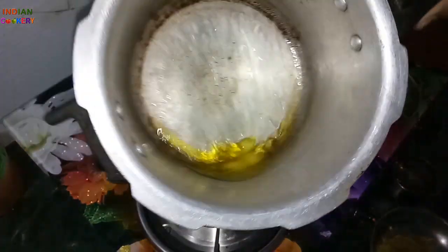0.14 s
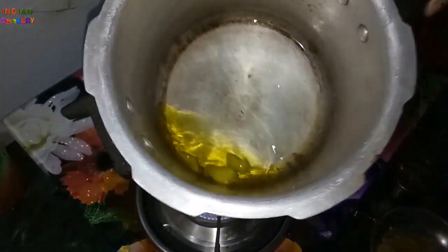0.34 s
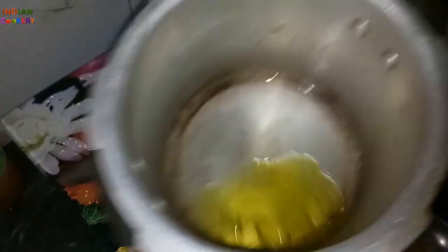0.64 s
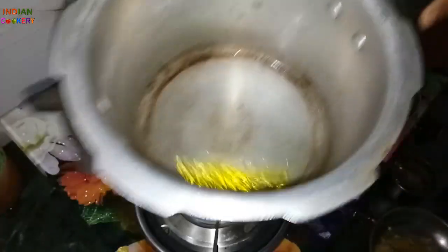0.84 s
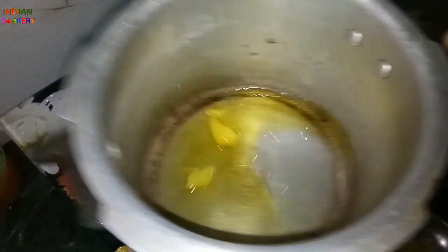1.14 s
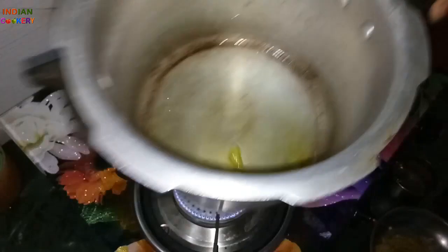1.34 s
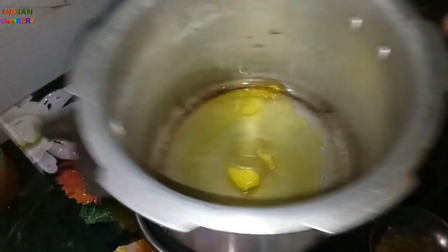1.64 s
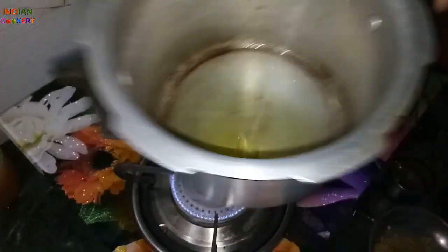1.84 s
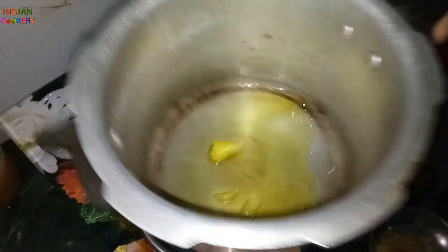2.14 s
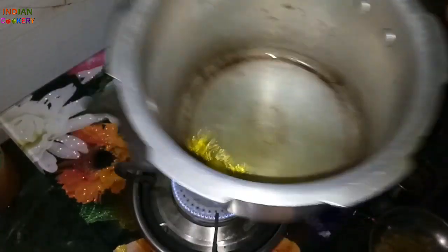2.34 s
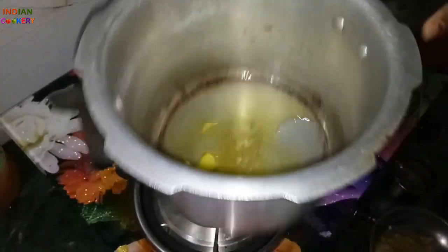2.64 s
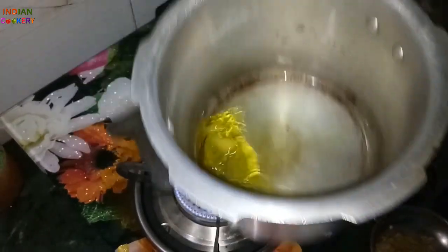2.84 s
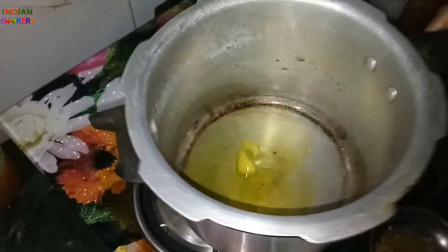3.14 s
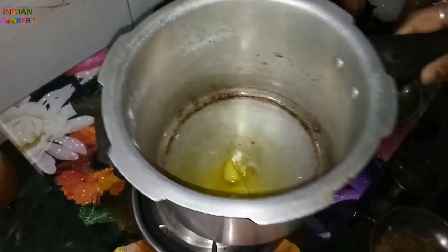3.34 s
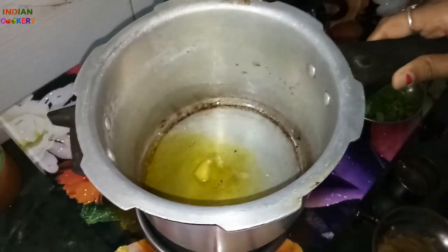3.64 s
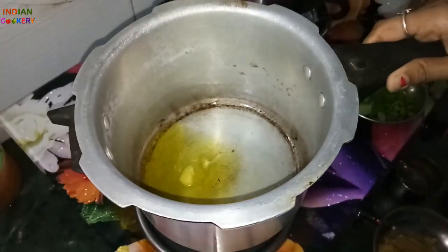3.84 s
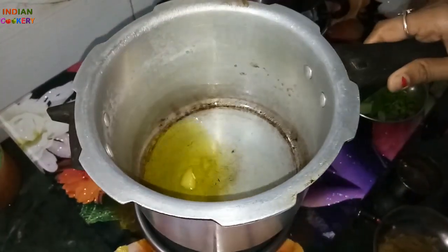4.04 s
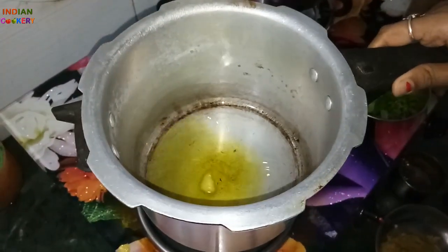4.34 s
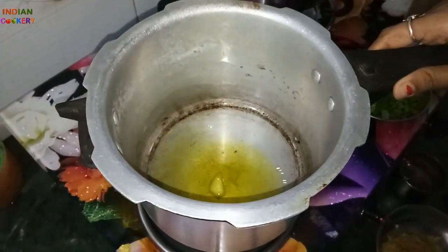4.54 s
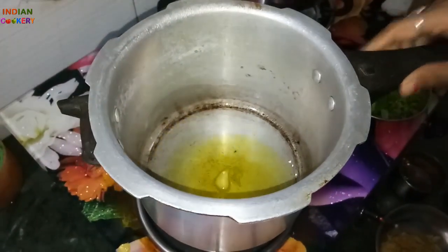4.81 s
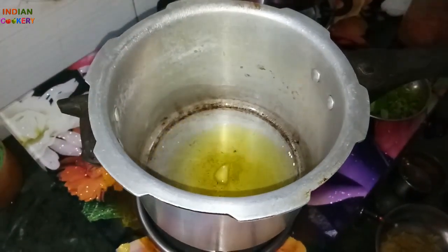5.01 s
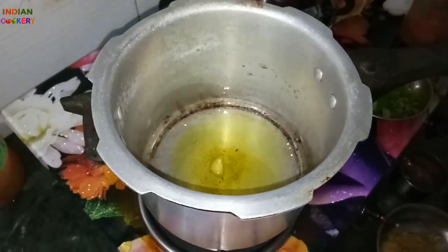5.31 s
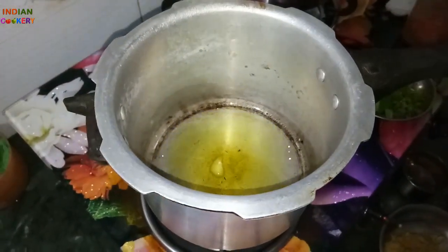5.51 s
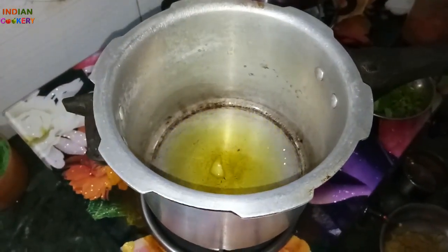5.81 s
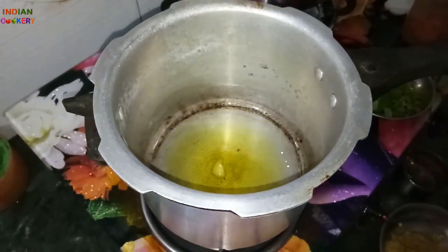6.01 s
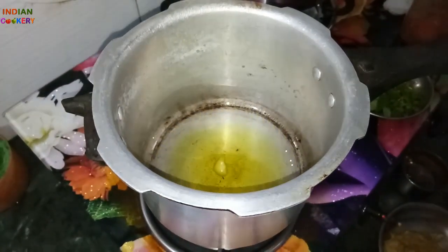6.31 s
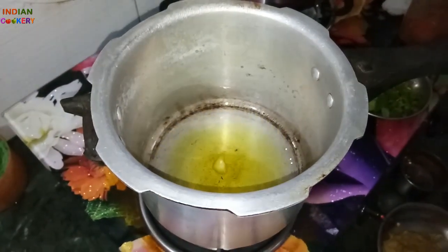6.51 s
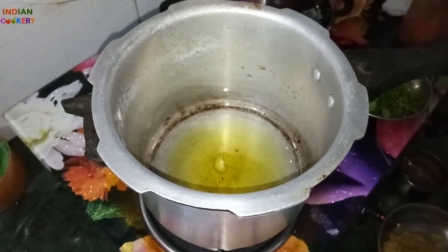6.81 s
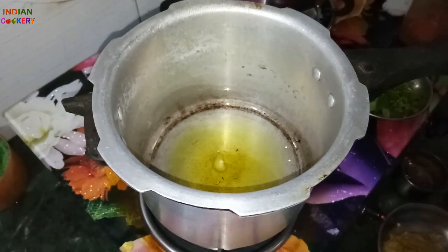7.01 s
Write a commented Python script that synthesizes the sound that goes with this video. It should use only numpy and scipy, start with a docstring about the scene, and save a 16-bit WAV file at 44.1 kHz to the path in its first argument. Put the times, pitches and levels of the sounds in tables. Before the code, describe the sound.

Fat melts in a hot metal cooker, recorded very close by phone in a small, slightly reverberant kitchen. At 0 s a bright rush of sizzling drops quickly to crackle, with a splutter around 0.4-0.6 s. From 0.7 to 2.4 s sharp high ticks and snapping pops come thickly, fizz swelling near 1.6 and 2.1 s. A brief splutter comes at 2.6 s, then sparser pops. Hard spits crack at 3.4 and 3.55 s. Around 3.9-4.2 s lower, hollow pops ring the metal amid another fizz flare. Dull worktop knocks land near 4.0, 4.4, 4.8 and 5.0 s, the 4.4 s one strongest. Fine fizz then nearly vanishes; distinct pops, low and high, with short metallic rings, continue irregularly to 7 s, crowding around 5.4-6.0 s. A faint sliding wash ends by 4.2 s; a very quiet, fluttering gas flame lies underneath throughout.

```python
"""Ghee melting in a hot aluminium pressure cooker on a gas stove, close to a phone in a small kitchen.
Water in the fat boils off: steam bubbles pop and ring the pot, drops spit, ticks and a fine fizz surround them.
Pops are torn clicks plus pot modes, most of which sink as the melt spreads; the fizz is random grains and hiss.
Swirled ghee washes softly round the pot. Dull knocks, as noisy rattles and a low sine, come from the worktop.
Behind them lie the short reverberation of the kitchen and the fluttering noise of the gas flame."""
import sys
import numpy as np
from scipy import signal
from scipy.fft import rfft, irfft
from scipy.io import wavfile
from scipy.ndimage import uniform_filter1d

SR = 44100
rng = np.random.default_rng(int(sys.argv[2]) if len(sys.argv) > 2 else 0)


def unload_audio(sound):
    """Save the sound as a 16-bit wav file, at the path given as the first command line argument."""
    columns = np.transpose(np.atleast_2d(sound))
    # keep every value between -1 and 1, then stretch to whole-number steps
    steps = np.round(np.clip(columns, -1, 1) * 32767)
    wavfile.write(sys.argv[1], SR, steps.astype(np.int16))


N = 315756
TIME = np.arange(N) / SR
# short sounds: length in samples, their frequencies [Hz] and time since onset [s]
TAPS = 4096
HZ = np.fft.rfftfreq(TAPS, 1 / SR)
AGE = np.arange(TAPS) / SR
EDGE_HZ = 15850  # upper band edge of the phone


def amp(db):
    """Decibels to gain."""
    return 10 ** (np.asarray(db) / 20)


def evened(x):
    """Scales to rms 1."""
    return x / np.sqrt(np.mean(x ** 2) + 1e-20)


def burst(x):
    """Scales a short sound to the energy of 10 ms at rms 1."""
    return x * np.sqrt(SR / 100 / np.sum(x ** 2))


def spectrum(points, hz):
    """Reads a table on a logarithmic frequency axis."""
    f, value = np.transpose(points)
    return np.interp(np.log(hz + 1), np.log(f), value)


def add(mix, s, sound):
    """Mixes a sound in at time s."""
    part = mix[max(round(s * SR), 0):][:len(sound)]
    part += sound[:len(part)]


def click(gain):
    """The causal, minimum-phase click that has this gain at each of HZ."""
    both_sides = np.r_[gain, gain[-2:0:-1]]
    log_gain = np.log(np.maximum(both_sides, 1e-5))
    return np.fft.ifft(np.exp(np.conj(signal.hilbert(log_gain)))).real


def peak(hz, centre_hz, width_hz):
    """Gain of one resonance."""
    return 1 / np.sqrt(1 + ((hz ** 2 - centre_hz ** 2) / (width_hz * (hz + 1))) ** 2)


def dying(t, t60):
    """Decay by 60 dB in t60 seconds."""
    return np.exp(-np.log(1000) * t / t60)


# big, low bubbles shove the pot fully; above SHOVE_HZ the ring and the snap weaken with every octave
SHOVE_HZ, RING_DB_PER_OCTAVE, SNAP_DB_PER_OCTAVE = 3600, -16.5, -6.5
# a film can snap only so hard: its level at a pop of FILM_DB, and the dB that it gains per dB of pop
FILM_DB, FILM_GROWTH = -29, 0.67
# larger steam bubbles bursting, close to the phone: (time [s], level [dB], bubble pitch [Hz])
BUBBLE_POPS = [(0.024, -25, 6850), (0.052, -24, 7100), (0.3826, -43.5, 3600), (0.3876, -24, 6770),
               (0.6414, -25.5, 6060), (0.7763, -29.5, 7200), (0.8256, -30, 6600), (0.838, -23.5, 8100),
               (0.8799, -25, 6950), (0.8984, -31.5, 4960), (0.956, -32, 7000), (1.0523, -29, 6740),
               (1.1809, -23, 6900), (1.2368, -29, 3930), (1.2642, -33.5, 2300), (1.7524, -33, 5000),
               (1.809, -32.5, 3830), (2.4723, -31, 4790), (2.5063, -33.5, 4730), (2.5743, -39, 2750),
               (2.5878, -37.5, 3600), (2.8882, -26.5, 6750), (2.9952, -29, 5970), (3.083, -29.5, 3600),
               (3.131, -30.5, 5730), (3.429, -27.5, 7150), (3.5956, -30, 6900), (3.6672, -28.5, 7200),
               (3.806, -31.5, 5360), (3.8587, -32.5, 6300), (3.888, -22.5, 2410), (3.9063, -25.5, 2280),
               (3.9403, -28.5, 7000), (4.018, -26, 6960), (4.051, -26.5, 2140), (4.1426, -30.5, 4600),
               (4.1981, -24, 4460), (4.3197, -28.5, 2230), (4.508, -34.5, 5530), (4.5864, -28, 3560),
               (4.643, -25.5, 6500), (4.8909, -33.5, 4270), (5.0773, -31.5, 3610), (5.131, -30, 3900),
               (5.1591, -32.5, 2330), (5.191, -34, 6400), (5.2945, -32.5, 5260), (5.4138, -28, 6260),
               (5.4392, -26.5, 3610), (5.5163, -30.5, 5260), (5.574, -34, 5550), (5.6026, -34, 4550),
               (5.646, -31.5, 4680), (5.6853, -29, 6600), (5.875, -31, 6800), (5.9173, -30, 4650),
               (5.946, -32.5, 5700), (5.9781, -30.5, 3670), (5.987, -35.5, 4700), (6.013, -41.5, 3100),
               (6.2771, -26, 5430), (6.3681, -28.5, 6590), (6.3875, -32, 3890), (6.5171, -32, 3830),
               (6.5523, -24.5, 2450), (6.5917, -27.5, 6030), (6.6894, -34, 5100), (6.7537, -31.5, 2700),
               (6.8011, -28, 6750), (6.817, -26, 4740), (6.8805, -34.5, 3960), (6.916, -27.5, 2510),
               (6.9728, -29.5, 5670), (7.0241, -32.5, 4360), (7.07, -28.5, 3210)]


def pops(bubble_db, snap_db, ring_db, dull_hz):
    """The film snaps, the steam pocket rings for a few cycles, and the pot sings on, most after big bubbles."""
    out = np.zeros(N)
    for s, level_db, hz in BUBBLE_POPS:
        smallness = max(np.log2(hz / SHOVE_HZ), 0)  # octaves
        film_db = FILM_DB + FILM_GROWTH * (level_db - FILM_DB) + SNAP_DB_PER_OCTAVE * smallness
        pot_db = level_db + RING_DB_PER_OCTAVE * smallness

        pocket = click(peak(HZ, hz, width_hz=.11 * hz) * peak(HZ, hz, width_hz=.7 * hz))
        pocket = signal.oaconvolve(pocket, stutter(count=3, spread_s=0.0052))

        # shreds of the film whistle high up
        shred = peak(HZ, rng.uniform(8620, 9800), width_hz=120)
        snap = click(snap_colour() * (1 + 3.4 * shred) / (1 + (HZ / dull_hz) ** 4))
        snap = signal.oaconvolve(snap, stutter(count=3, spread_s=0.024))

        add(out, s, amp(level_db + bubble_db) * burst(walls(pocket, echo_db=6.5, t60=0.085)))
        add(out, s, amp(film_db + snap_db) * burst(walls(snap, echo_db=6.5, t60=0.019)))
        add(out, s, amp(pot_db + ring_db) * pot_ring(s, hz, spill=0.053))
    return out


# colour of a snapping film: (frequency [Hz], relative level [dB per Hz])
SNAP_SPECTRUM = [(330, -34), (520, -12.5), (1000, -20.5), (2200, -12.5), (4000, -5.5), (6000, -4),
                 (8000, -6), (10000, 6), (11500, -3), (13500, -10.5), (14900, 4), (16000, 2)]


def snap_colour():
    """Gain at each of HZ of the bright crack shared by films, droplets, spits and splutters."""
    return amp(spectrum(SNAP_SPECTRUM, HZ))


def stutter(count, spread_s):
    """A film tears in one full slip, then several at random, the later ones weaker on average."""
    delay, size = rng.random((2, count))
    slips = np.zeros(TAPS)
    places = np.minimum(delay * spread_s * SR, TAPS - 1).astype(int)
    slips[places] = size * (1 - delay / 2) * rng.choice([-1, 1], count)
    slips[0] = 1
    return slips


def walls(x, echo_db, t60):
    """The direct sound, then its scatter between the metal walls of the pot as decaying noise."""
    echoes = rng.standard_normal(TAPS) * dying(AGE, t60) * (1 - np.exp(-AGE / 0.00018))
    echoes *= amp(echo_db) / np.linalg.norm(echoes)
    echoes[0] = 1
    return signal.oaconvolve(x, echoes)


# how far the melt loads the bottom of the pot: (time [s], share [0-1])
MELT_SPREAD = [(0, 0.11), (3.2, 0.24), (3.9, 0.3), (4.35, 0.69), (4.6, 0.69), (5.5, 0.95), (6.6, 0.98)]
# modes of the pot, before random detuning and the extra early decay:
# (dry frequency [Hz], level [dB], t60 [s], drop under the full melt [Hz], negative = rise)
POT_MODES = [(1757, -2.5, 0.11, 156.5), (2500.6, 1, 0.098, 163), (2531, 1, 0.22, 127), (3501, -3, 0.22, 86),
             (4270, 0, 0.037, 72), (5017, -4, 0.1, -13), (5540, -15.5, 0.27, 87), (6720, -1.5, 0.073, -8),
             (6950, -0.5, 0.054, 13)]


def pot_ring(s, pitch_hz, spill):
    """The pot's modes; those near the bubble's pitch are driven hardest, and the sloshing fat makes them waver."""
    t = np.arange(SR // 4) / SR
    hz, db, t60, drop_hz = np.transpose(POT_MODES)[:, :, None]
    hz = hz - drop_hz * np.interp(s, *np.transpose(MELT_SPREAD))
    place, phase, detune = rng.standard_normal((3, len(POT_MODES), 1))
    drive = amp(db + 2 * place) * (peak(hz, pitch_hz, width_hz=420) + spill)
    # a random walk in phase, in cycles
    slosh = .003 * np.cumsum(rng.standard_normal((len(POT_MODES), len(t))), axis=1)
    cycles = hz * (1 + 0.00688 * detune) * t + phase + slosh
    modes = drive * dying(t, t60) * np.sin(2 * np.pi * cycles)
    # the fat soaks up the first, wide swings fastest
    ring = modes.sum(0) * (1 - np.exp(-t / 0.0011)) * (.5 + dying(t, t60=0.34))
    return ring / np.sqrt(np.mean(ring[:TAPS // 4] ** 2))


# drops of water that hit bare metal and spit with a hard, wide crack: (time [s], level [dB])
WATER_SPITS = [(1.2493, -27), (1.4832, -24.5), (2.3768, -29), (3.3876, -20.5), (3.5433, -21), (4.066, -27),
               (5.0097, -23.5), (5.286, -29)]


def spits(dull_hz, ring_db):
    """A drop flashes to steam all at once: one full-bodied crack that barely rings the pot."""
    out = np.zeros(N)
    crack = click(snap_colour() / np.sqrt(1 + (HZ / dull_hz) ** 2))
    for s, level_db in WATER_SPITS:
        torn = signal.oaconvolve(crack, stutter(count=3, spread_s=0.0016))
        add(out, s, amp(level_db) * burst(walls(torn, echo_db=-2.5, t60=0.06)))
        add(out, s, amp(level_db + ring_db) * pot_ring(s, 4400, spill=0.13))
    return out


# the louder droplets bursting at the surface: (time [s], level [dB], pitch [Hz])
DROPLET_TICKS = [(0.1634, -41, 14600), (0.2004, -22.5, 8700), (0.3122, -32, 14800), (0.7365, -24.5, 10700),
                 (0.8527, -24, 9500), (1.0251, -34, 14300), (1.1007, -28, 9870), (1.144, -20, 9350),
                 (1.1539, -29, 9000), (1.1726, -21.5, 8750), (1.2912, -28, 9700), (1.327, -30.5, 15300),
                 (1.363, -34, 15200), (1.374, -34, 15000), (1.3991, -30, 14700), (1.4408, -23.5, 10000),
                 (1.4893, -32, 14900), (1.541, -32.5, 14900), (1.583, -26.5, 10300), (1.6433, -31.5, 9200),
                 (1.704, -34.5, 15500), (1.7639, -23, 8800), (1.849, -32.5, 14600), (1.9145, -29.5, 15170),
                 (1.9402, -27, 15300), (2.011, -33.5, 10600), (2.0425, -24.5, 8260), (2.0688, -24.5, 9300),
                 (2.0913, -25, 15100), (2.1119, -24.5, 9800), (2.202, -31.5, 9800), (2.2284, -26.5, 9000),
                 (2.238, -54, 14700), (2.309, -39.5, 14700), (2.615, -28, 8500), (2.7005, -29.5, 9640),
                 (2.7379, -26, 8800), (2.9119, -31, 8700), (2.9658, -25.5, 10000), (2.9738, -31.5, 15200),
                 (3.0382, -30, 10400), (3.3182, -30.5, 8150), (3.4006, -40, 10000), (3.4097, -32, 9700),
                 (3.513, -27.5, 10200), (3.563, -30, 8800), (3.8522, -33, 8700), (3.9536, -32.5, 10400),
                 (4.0053, -32.5, 9850), (4.1235, -29.5, 10700), (4.292, -29, 14840), (4.3727, -23.5, 9050),
                 (4.4432, -31, 10700), (4.6113, -29.5, 10000), (4.8797, -42, 10500), (5.4622, -27.5, 9400),
                 (5.5253, -25.5, 8600), (5.6203, -25, 9260), (6.1194, -41, 15000), (6.1297, -31.5, 8370),
                 (6.2182, -30.5, 10260), (6.3449, -29.5, 9500), (6.44, -32, 10230), (6.897, -27.5, 10600)]


def ticks(gain_db, tone_db, crack_db):
    """Tiny bursts: the smallest droplets crack dry, the larger ones ping and scatter."""
    out = np.zeros(N)
    for s, level_db, hz in DROPLET_TICKS + stray_ticks(count=400, scatter_db=-9):
        size = np.interp(hz, [9500, 14500], [1, 0])  # a low pitch means a large droplet
        ping = amp(tone_db + 12.7 * size) * peak(HZ, hz, width_hz=610)
        tick = click(snap_colour() * (1 + ping) / (1 + (HZ / EDGE_HZ) ** 20))
        # one sharp crack, then the skin of the droplet tears for a few milliseconds
        tear = rng.standard_normal(TAPS) * dying(AGE, t60=.005)
        tear[0] = amp(crack_db)
        tick = signal.oaconvolve(tick, tear)
        add(out, s, amp(level_db + gain_db) * burst(walls(tick, echo_db=-3.0 + 4.4 * size, t60=0.061)))
    return out


# faint stray ticks: rate and level when the boil is at SIMMER_DB, and the dB each gains per dB of boil
SIMMER_DB, STRAY_PER_S, STRAY_DB, STRAY_CROWDING, STRAY_GROWTH = -39, 12, -36, 1.3, 0.14


def stray_ticks(count, scatter_db):
    """Ticks left to chance, as (s, dB, Hz) rows: the harder the boil, the more and the louder they are."""
    place, luck, size, pitch = rng.random((count, 4)).T
    s = (np.arange(count) + place) / count * N / SR
    over_db = boil_level(s) - SIMMER_DB
    chance = STRAY_PER_S * amp(STRAY_CROWDING * over_db) * N / SR / count
    bursts = luck < chance
    level_db = STRAY_DB + STRAY_GROWTH * over_db + abs(scatter_db) * (1 - 2 * size)
    # mostly two bands of pitch
    hz = np.interp(pitch, [0, .6, .65, 1], [8800, 10400, 14500, 15200])
    return list(np.c_[s, level_db, hz][bursts])


# wet ghee sliding onto hot metal boils up: (time [s], length [s], level [dB])
BOIL_UPS = [(0, 0.193, -39.5), (0.381, 0.24, -32.5), (.825, 0.046, -36.5), (1.165, 0.11, -39),
            (2.072, 0.079, -32.5), (2.577, 0.064, -33), (3.545, 0.15, -47.5), (3.896, 0.099, -36),
            (4.06, 0.022, -27), (5.571, 0.074, -36), (6.82, 0.047, -35), (7.023, 0.29, -40)]


def splutters(per_s, ring_db):
    """Crowds of small bubbles, random impulses that start at once, die down and keep the pot ringing."""
    out = np.zeros(N)
    colour = click(snap_colour() * peak(HZ, 4200, width_hz=3900))
    for s, length, level_db in BOIL_UPS:
        t = np.arange(0, length, 1 / SR)
        bubbles = rng.standard_normal(N) * (rng.random(N) < per_s / SR)
        bubbles = bubbles[:len(t)] * np.sqrt(1 - t / length)
        gain = amp(level_db) * np.sqrt(100 * length / 2)  # longer crowds carry more energy
        crackle = walls(signal.oaconvolve(bubbles, colour), echo_db=-22, t60=0.027)
        ring = signal.oaconvolve(bubbles, pot_ring(s, 6490, spill=0.051))
        add(out, s, gain * burst(crackle))
        add(out, s, gain * amp(ring_db) * burst(ring))
    return out


# how hard the finest droplets boil; it flares as the ghee is swirled and fades as the water goes:
# (time [s], level [dB])
BOIL = [(0, -18.5), (0.1, -30.5), (0.56, -45), (0.75, -43), (0.99, -55), (1.17, -45.5), (1.62, -37.5),
        (1.88, -54), (2.12, -39.5), (2.34, -53.5), (3.02, -50), (3.3, -69), (3.42, -46), (3.74, -55),
        (4.08, -41), (4.35, -65), (5.56, -63.5), (7.16, -79)]


def boil_level(s):
    """Level of the boil in dB at time s, which drives the fizz and the stray ticks."""
    return np.interp(s, *np.transpose(BOIL))


# colour of the finest droplets: (frequency [Hz], relative level [dB per Hz])
FIZZ_SPECTRUM = [(300, -52), (1200, -18), (2400, -47), (4000, -6.5), (5800, -11), (6800, -5), (7900, -10),
                 (9800, -1.5), (12000, -7), (13700, -36), (14900, 5.5), (16000, -9.5)]


def fizz(gain_db, per_s, spread_db, hiss_db, steady_db):
    """Droplets of uneven size and pitch crowd together at a hard boil, over a hiss that never quite stops."""
    boil_db = boil_level(TIME)
    crowd = amp(0.47 * (boil_db - boil_db.mean()))
    # too small to radiate bass
    colour = amp(spectrum(FIZZ_SPECTRUM, HZ)) * HZ ** 2 / (HZ ** 2 + 1100 ** 2)

    sizes = amp(spread_db * np.minimum(rng.exponential(1, N), 3))
    sizes = sizes * (rng.random(N) < crowd * per_s / SR) / np.sqrt(crowd)
    pitches = np.geomspace(6500, 15000, num=16)
    kind = rng.integers(0, len(pitches), N)
    grains = np.zeros(N)
    for k, hz in enumerate(pitches):
        droplet = click(colour * (1 + 2 * peak(HZ, hz, width_hz=1300)))
        grains += signal.oaconvolve(sizes * (kind == k), droplet)[:N]

    hiss = evened(signal.oaconvolve(rng.standard_normal(N), click(colour))[:N])
    boil = evened(walls(grains, echo_db=-4.0, t60=0.027)[:N]) + amp(hiss_db) * hiss
    return amp(gain_db + boil_db) * boil + amp(steady_db) * hiss


# while the pot is swirled the ghee slides over its bottom: until (s), fading over (s)
SWIRL_END_S, SWIRL_FADE_S = 4.2, 0.65


def swirl(level_db, centre_hz, width_hz, patchy_db):
    """Soft, wandering wash of the ghee sliding round the pot: band noise with smooth random patches."""
    hz, t, z = signal.stft(rng.standard_normal(N), SR, nperseg=2048, noverlap=1536)
    patches = uniform_filter1d(rng.standard_normal(z.shape), size=5, axis=0)  # over frequency
    patches = evened(uniform_filter1d(patches, size=14, axis=1))  # over time
    z = z * peak(hz, centre_hz, width_hz)[:, None] ** 2 * amp(patchy_db * patches)
    wash = evened(signal.istft(z, SR, nperseg=2048, noverlap=1536)[1][:N])
    return amp(level_db) * wash * np.clip((SWIRL_END_S - TIME) / SWIRL_FADE_S, 0, 1)


# knocks and scuffs on the worktop:
# (time [s], level [dB], length of the rattle [s], brightness [dB per octave])
WORKTOP_KNOCKS = [(3.65, -45, 0.11, 0), (3.967, -25.5, 0.036, 1), (4.391, -22, 0.018, -1.9),
                  (4.781, -27.5, 0.014, 0.5), (4.852, -35, 0.033, 0.5), (5.006, -27.5, 0.043, -2),
                  (5.138, -43, 0.032, 1.5)]
# colour of the worktop: (frequency [Hz], relative level [dB per Hz])
WORKTOP_SPECTRUM = [(60, -55), (125, -17), (165, -8), (205, -11.5), (250, 10), (305, -4.5), (380, -4),
                    (500, -7.5), (720, -11.5), (900, -9), (1100, -16), (1330, -13), (1600, -19),
                    (2300, -19.5), (4000, -28.5), (9000, -49)]


def knocks(boom_db, boom_hz, boom_t60):
    """Dull blows, each a quick rattle of contacts; the worktop booms on at one low note."""
    out = np.zeros(N)
    t = np.arange(SR // 2) / SR
    for s, level_db, length, tilt_db in WORKTOP_KNOCKS:
        # rough noise with about 500 harder contacts a second
        contacts = rng.standard_normal(len(t)) * (0.56 + (rng.random(len(t)) < 500 / SR) * 4)
        rattle = contacts * (1 - np.exp(-3 * t / length)) * dying(np.maximum(t - length, 0), t60=0.2)
        body = click(amp(spectrum(WORKTOP_SPECTRUM, HZ) + tilt_db * np.log2((HZ + 1) / 400)))
        boom = np.sin(2 * np.pi * boom_hz * t) * dying(t, boom_t60)
        add(out, s, amp(level_db) * burst(signal.fftconvolve(rattle, body)))
        add(out, s, amp(level_db + boom_db) * burst(signal.fftconvolve(rattle, boom)))
    return out


# kitchen reverberation: (frequency [Hz], t60 [s])
KITCHEN_DECAY = [(250, 0.56), (1000, 0.4), (4000, 0.37), (9000, 0.19), (16000, 0.27)]


def kitchen(x):
    """Diffuse tail of a small tiled room: noise that swells briefly, its treble dying sooner than its bass."""
    hz, t, z = signal.stft(rng.standard_normal(SR // 2), SR, nperseg=256)
    tail = signal.istft(z * dying(t, spectrum(KITCHEN_DECAY, hz)[:, None]), SR)[1]
    tail *= 1 - np.exp(-np.arange(len(tail)) / SR / 0.0087)
    return signal.fftconvolve(x, tail / np.linalg.norm(tail))[:N]


# colour of the steady background: (frequency [Hz], relative level [dB per Hz])
FLAME_SPECTRUM = [(20, -2.5), (50, 0.5), (100, 1.5), (150, -9.5), (300, -3), (550, -6.5), (1000, -13.5),
                  (2400, 1), (6000, -68), (16000, -67)]


def burner(level_db, flutter_db):
    """Soft rush of the gas flame: coloured noise whose level flutters at random below 10 Hz."""
    hz = np.fft.rfftfreq(N, 1 / SR)
    rush = evened(irfft(rfft(rng.standard_normal(N)) * amp(spectrum(FLAME_SPECTRUM, hz)), N))
    flutter = evened(irfft(rfft(rng.standard_normal(N)) * (hz < 10), N))
    return amp(level_db + flutter_db * flutter) * rush


def scene():
    """The pot, near the phone, is mostly dry; the knocks carry more of the room."""
    frying = pops(bubble_db=-0.6, snap_db=-0.5, ring_db=2.9, dull_hz=16500)
    frying += spits(dull_hz=11200, ring_db=-21.5)
    frying += ticks(gain_db=0.48, tone_db=6.5, crack_db=12)
    frying += splutters(per_s=1800, ring_db=-5.5)
    frying += fizz(gain_db=0.5, per_s=520, spread_db=16.0, hiss_db=-13.5, steady_db=-61.0)
    wash = swirl(level_db=-73, centre_hz=500, width_hz=220, patchy_db=14.0)
    thuds = knocks(boom_db=-9.0, boom_hz=249, boom_t60=0.33)
    room = kitchen(amp(-11.5) * frying + amp(-9.5) * thuds)
    flame = burner(level_db=-61.0, flutter_db=2.0)
    return (frying + wash + thuds + room + flame)[None]


def record(dry):
    """The phone's microphone passes only what lies below its band edge."""
    low_pass = signal.firwin(255, EDGE_HZ, window=("kaiser", 8), fs=SR)
    return signal.oaconvolve(dry, low_pass[None], "same")


dry = scene()
out = record(dry)
unload_audio(out)
```